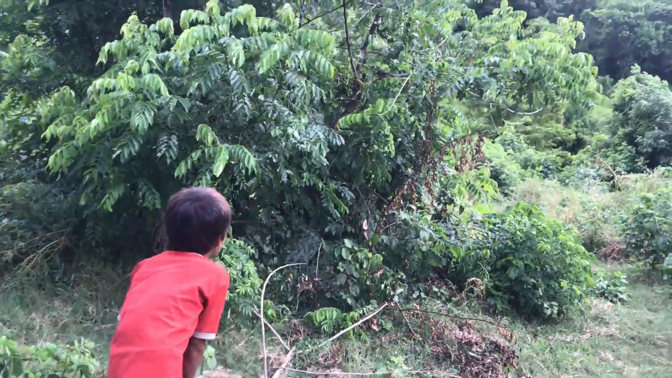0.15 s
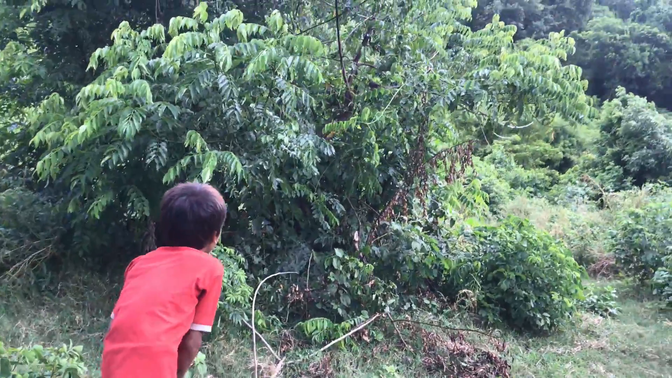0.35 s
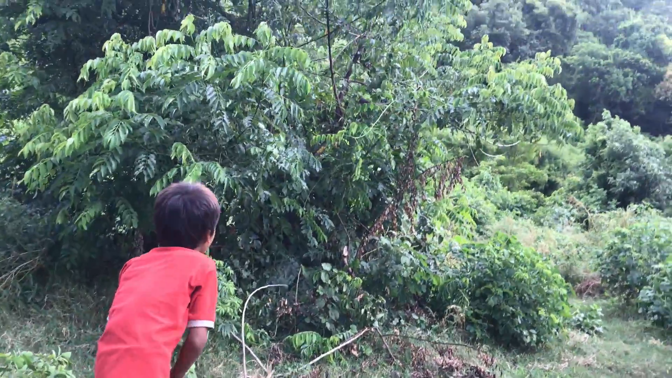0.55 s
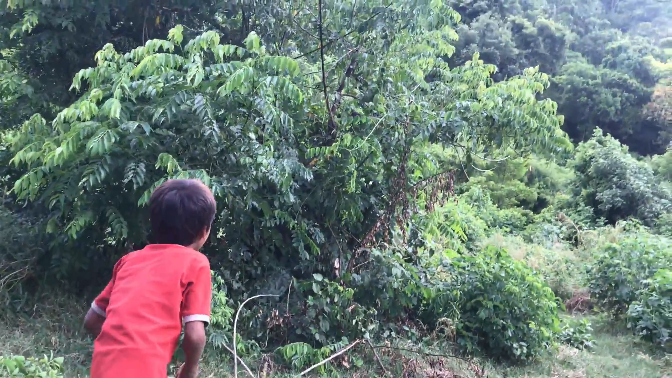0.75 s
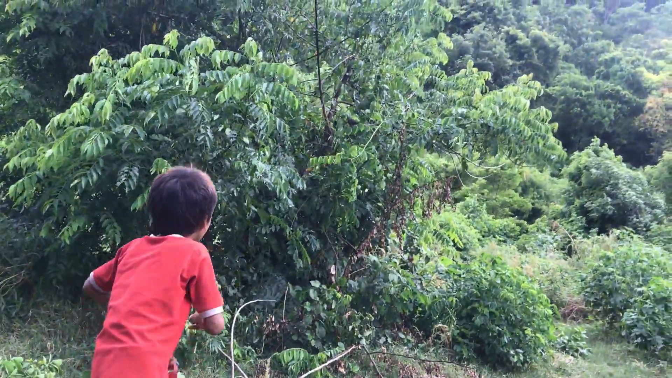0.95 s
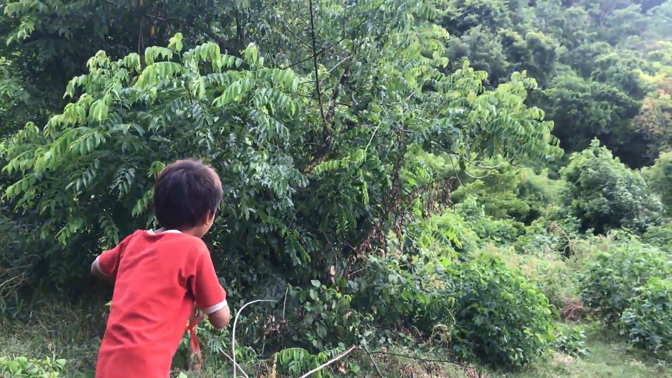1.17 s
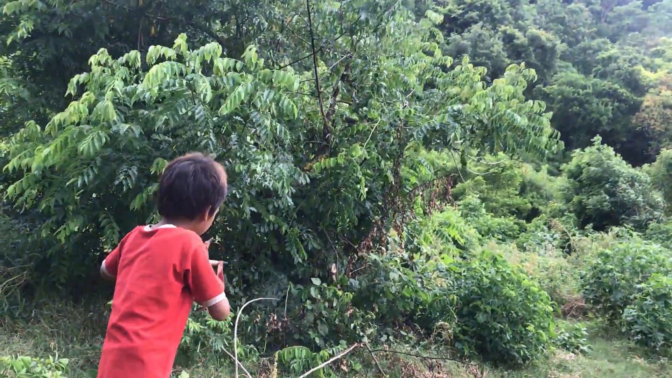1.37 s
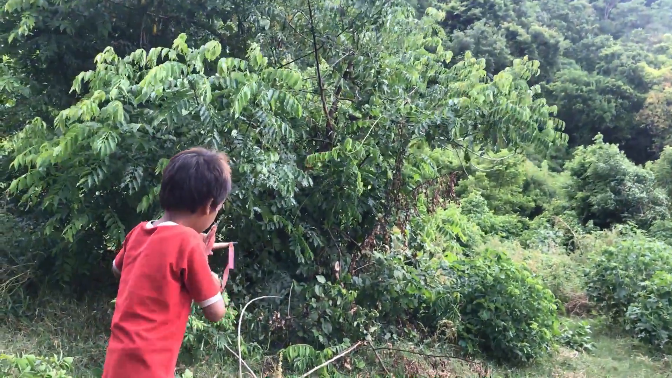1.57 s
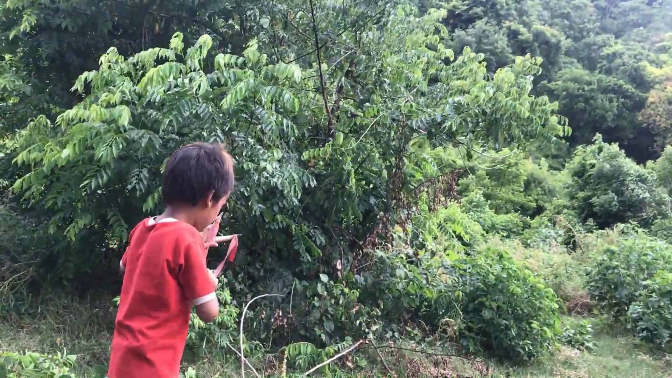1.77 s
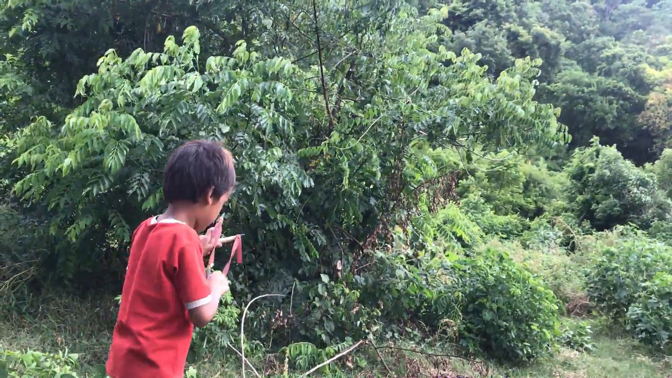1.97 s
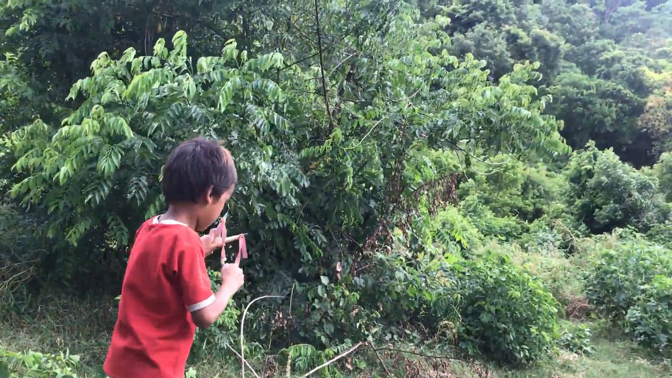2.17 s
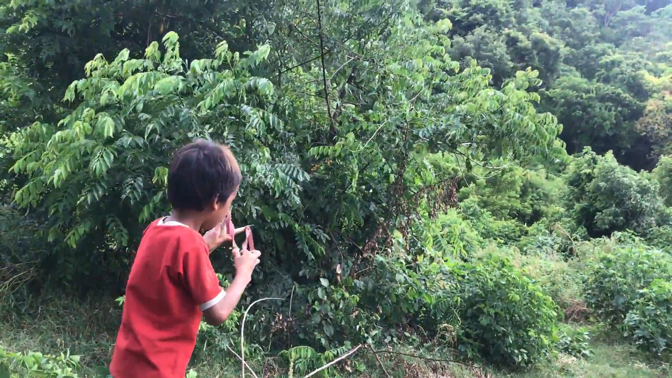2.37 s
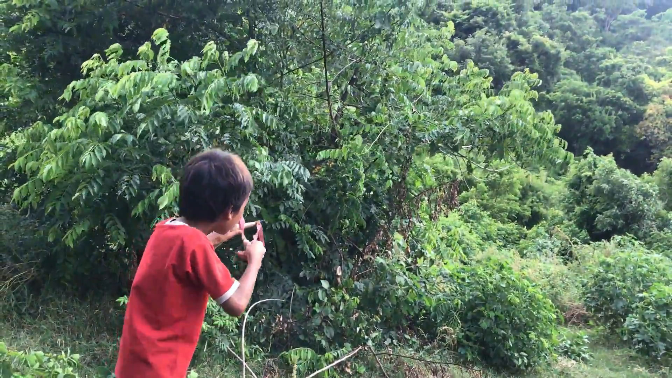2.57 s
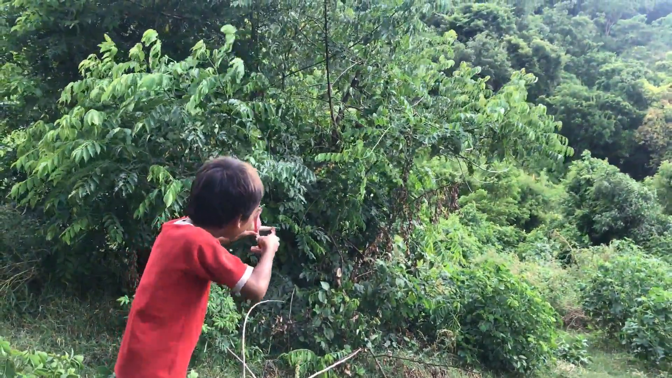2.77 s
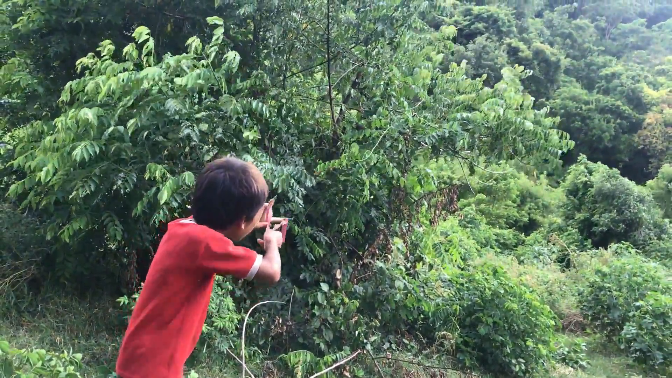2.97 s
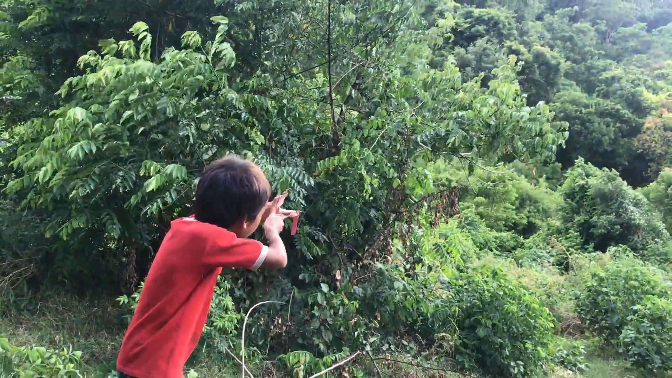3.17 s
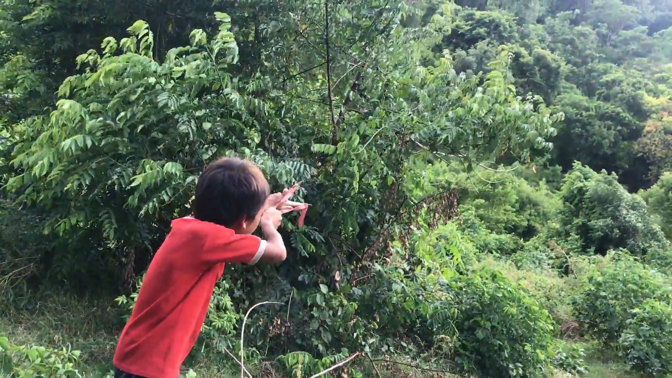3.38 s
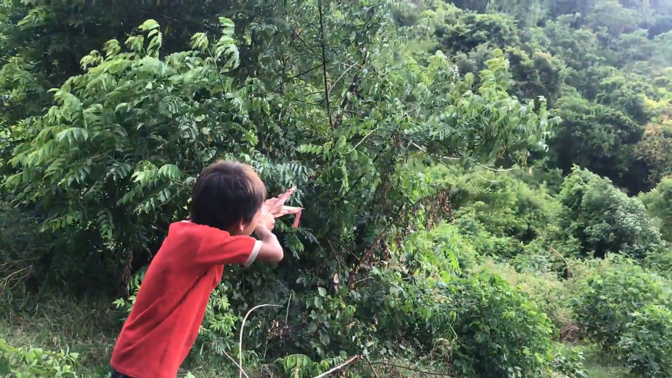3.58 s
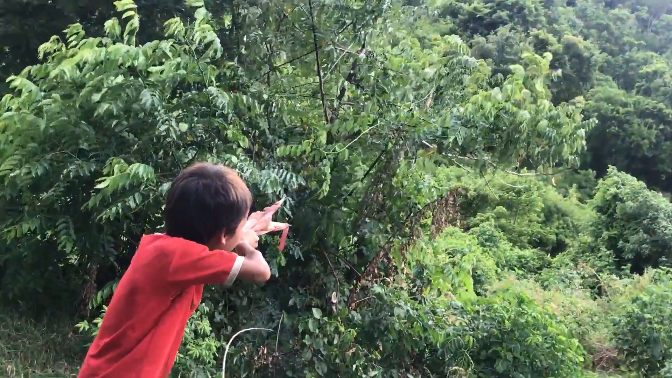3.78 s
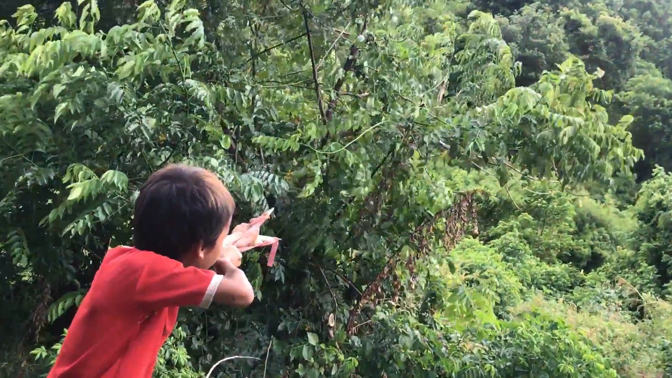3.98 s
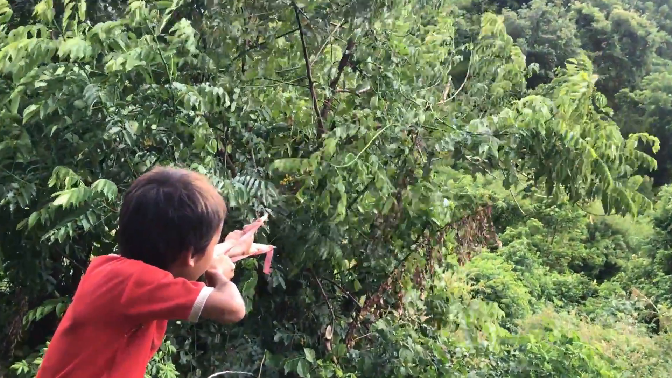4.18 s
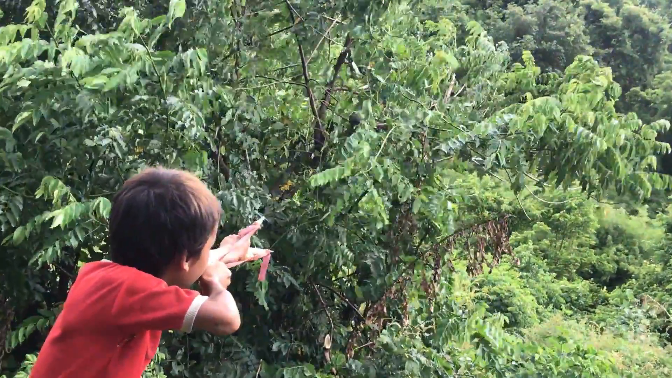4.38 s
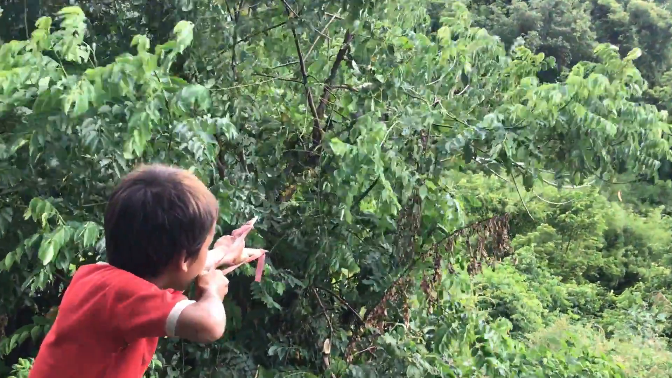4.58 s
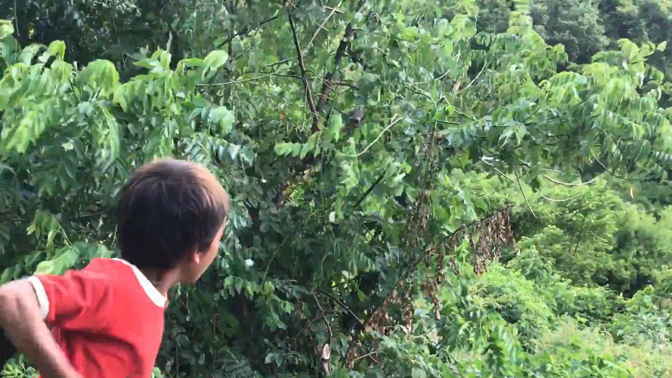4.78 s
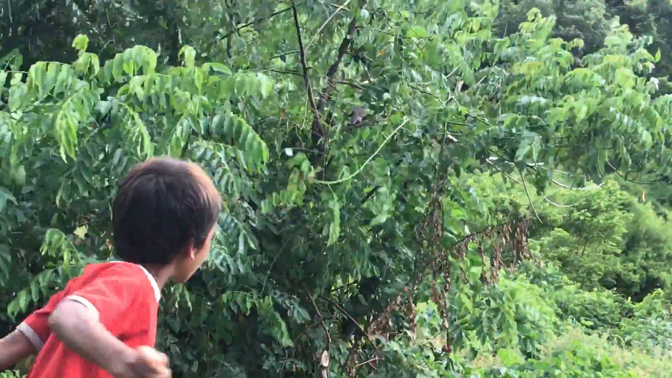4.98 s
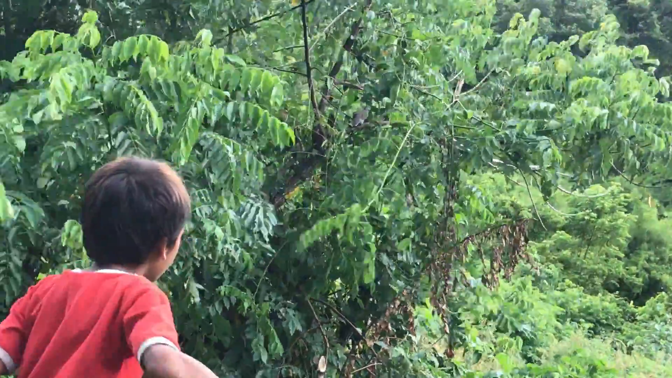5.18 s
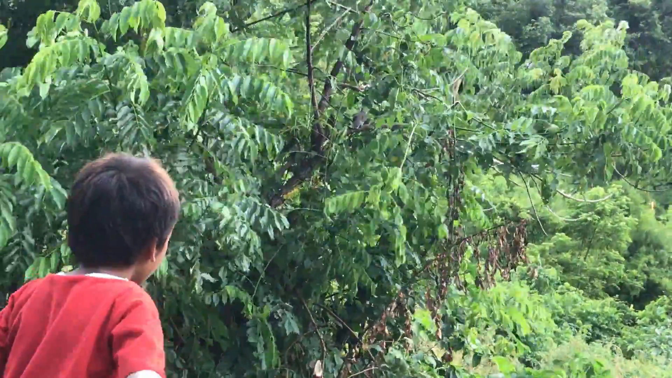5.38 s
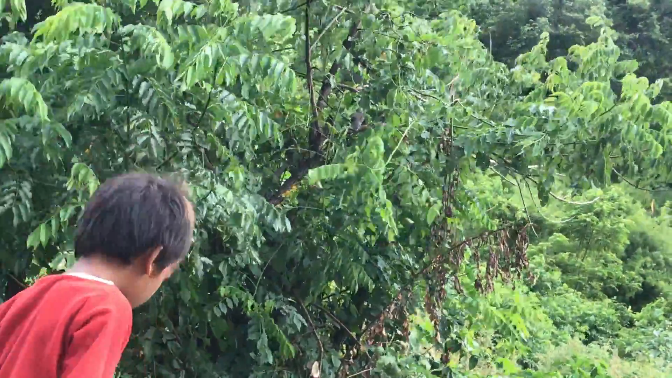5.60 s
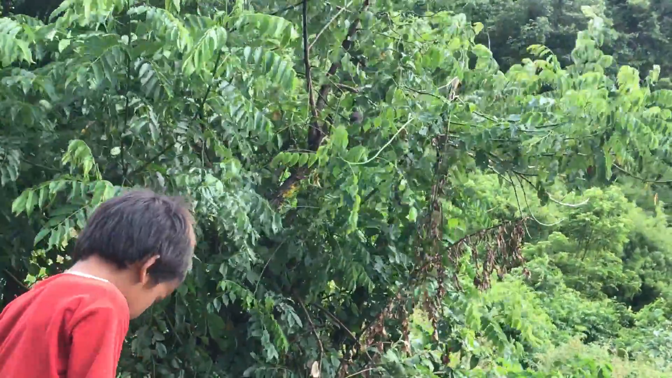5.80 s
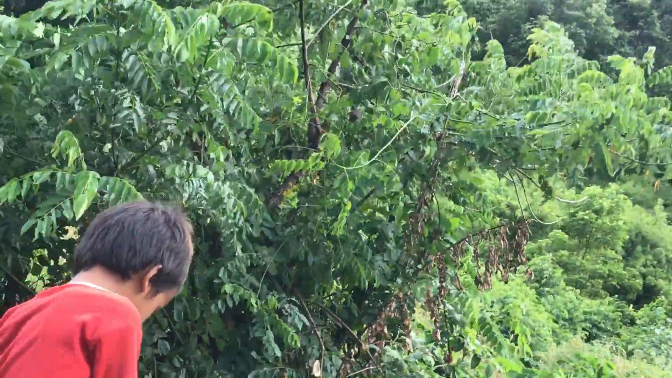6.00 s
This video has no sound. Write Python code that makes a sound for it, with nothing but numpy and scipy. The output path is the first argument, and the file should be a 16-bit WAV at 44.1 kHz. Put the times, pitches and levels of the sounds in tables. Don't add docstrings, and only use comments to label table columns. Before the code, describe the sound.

Steady shrill crickets and soft leaf hiss, small rustles, then a sudden band slap and hard crackling shot into foliage, with wind bumping the microphone.

```python
import sys
import numpy as np
from scipy import signal
from scipy.fft import rfft, irfft, next_fast_len
from scipy.io import wavfile
from scipy.ndimage import uniform_filter1d, map_coordinates

SR = 44100
rng = np.random.default_rng(int(sys.argv[2]) if len(sys.argv) > 2 else 0)


def digitize_waveform(pressure):
    field = np.atleast_2d(pressure).T
    bounded = np.clip(field, -1, 1)
    quanta = np.round(bounded * 32767).astype(np.int16)
    wavfile.write(sys.argv[1], SR, quanta)


def level_to_linear(level):
    exponent = np.asarray(level, float) / 20
    return 10 ** exponent


N = 266628
TIME_S = np.arange(N) / SR


def unit(x):
    return x / np.sqrt(np.mean(x ** 2) + 1e-20)


def curves(rows):
    s, *columns = np.transpose(rows)
    return [np.interp(TIME_S, s, column) for column in columns]


def wobble(rate, size=N):
    knots = rng.standard_normal(int(size * rate / SR) + 4)
    return map_coordinates(knots, [np.arange(size) * rate / SR])


def coloured(size, gain):
    white = rfft(rng.standard_normal(size))
    return unit(irfft(white * gain(np.fft.rfftfreq(size, 1 / SR) + 1), size))


def rush(spectrum, patchy_db):
    knot_hz, knot_db = np.transpose(spectrum)
    noise = coloured(next_fast_len(N), lambda hz: level_to_linear(np.interp(np.log(hz), np.log(knot_hz), knot_db)))
    cells = signal.stft(noise, nperseg=512)[2]
    field = uniform_filter1d(rng.standard_normal(cells.shape), 8, 0)
    field = uniform_filter1d(field, 12, 1)
    return unit(signal.istft(cells * level_to_linear(patchy_db * unit(field)), nperseg=512)[1][:N])


def add(track, s, sound):
    start = round(s * SR)
    sound = sound[max(-start, 0):][:len(track) - max(start, 0)]
    track[max(start, 0):][:len(sound)] += sound


def foliage(x, wet_db, t60):
    t = np.arange(SR // 4) / SR
    tail = level_to_linear(-60 * t / t60) * rng.standard_normal(len(t))
    return x + level_to_linear(wet_db) * signal.fftconvolve(x, tail / np.linalg.norm(tail))[:N]


# start_s, level_db
BREEZE = [
    (0, -56),
    (.76, -57.5),
    (1.63, -56),
    (3.3, -56.5),
    (3.82, -55),
    (4.55, -53),
    (5.12, -52.5),
    (6.05, -53),
]
# frequency_hz, density_db (per Hz)
LEAF_BODY = [(120, -37), (200, -4), (513, -7.5), (627, -4.5), (1990, -9), (4810, -12), (5440, -13.5),
             (5970, -9), (6650, -12.5), (8000, -33), (10400, -49), (17600, -120)]
# frequency_hz, density_db (per Hz)
LEAF_FIZZ = [(4300, -14), (7300, -2), (8300, -2), (9600, -3), (10400, -6.5), (11500, -2.5), (13000, -4),
             (14200, -7.5), (16000, -9)]


def leaves():
    body_db, = curves(BREEZE)
    fizz_db = -62 + 1.8 * (body_db - body_db.mean())
    stir_db = .5 * wobble(8.3) + 0.23 * wobble(25)
    body = level_to_linear(body_db + 0.12 * stir_db) * rush(LEAF_BODY, patchy_db=0.83)
    return body + level_to_linear(fizz_db + stir_db) * rush(LEAF_FIZZ, patchy_db=0.6)


# frequency_hz, density_db (per Hz)
RUMBLE = [(12, -65), (20, -44), (34, -14.5), (54, 1.5), (134, -6.5), (220, -16), (260, -24), (297, -18.5),
          (450, -24.5), (580, -33), (990, -120)]


def port_rumble():
    return level_to_linear(-54 + 1.26 * wobble(12)) * rush(RUMBLE, patchy_db=1.6)


# start_s, level_db, centre_hz
PUFFS = [(3.387, -36, 69), (3.422, -28.5, 91), (3.536, -35.5, 75), (3.59, -44, 126), (3.652, -41.5, 64),
         (3.769, -38.5, 135), (4.074, -33.5, 80), (4.12, -44, 170), (4.139, -34, 100), (4.446, -36.5, 138),
         (4.626, -36.5, 110), (4.661, -25.5, 165), (4.685, -28.5, 92), (4.705, -36, 129),
         (4.765, -35.5, 100), (4.795, -35.5, 93.5), (4.884, -35.5, 130), (4.907, -32.5, 82),
         (5.56, -33.5, 72), (5.675, -39.5, 83), (5.742, -37, 56.5), (5.76, -28, 172), (5.826, -35, 115),
         (5.871, -36, 89), (5.915, -37, 229), (5.925, -28, 114), (5.96, -30.5, 80), (5.996, -37, 95),
         (6.015, -25.5, 195), (6.043, -19.5, 139)]
SMALL_FROM_S, SMALL_DB, SMALL_SPREAD_DB, SMALL_HZ = 3.3, -46.5, 7, 65.6
EDGE_RATIO = 3.94


def eddies():
    out = np.zeros(N)
    t = np.arange(-2048, 2048) / SR
    bell = np.exp(-(t / 0.016) ** 2) + 0.73 * np.exp(-(t / 0.0079) ** 2)
    spread = [N / SR - SMALL_FROM_S, SMALL_SPREAD_DB, SMALL_HZ]
    small = [SMALL_FROM_S, SMALL_DB, SMALL_HZ] + rng.random((26, 3)) * spread
    for s, db, hz in [*PUFFS, *small]:
        def band(f):
            low_side = (f / hz) ** 1.51 / (1 + (f / hz) ** 4.12)
            return low_side / (1 + (f / hz / EDGE_RATIO) ** 4)

        eddy = bell * coloured(len(t), band)
        add(out, s + t[0], level_to_linear(db - 7.5) * eddy * np.linalg.norm(bell) / np.linalg.norm(eddy))
    return out


def whistle(hz, db, flutter_db, drift_hz):
    size = len(hz)
    level = level_to_linear(db + flutter_db * (0.69 * wobble(13.8, size) + wobble(56.1, size)))
    turns = np.cumsum(hz + drift_hz * wobble(39.7, size)) / SR
    return np.sqrt(2) * level * np.sin(2 * np.pi * turns)


def glide(length_s, hz, db):
    t = np.arange(0, length_s, 1 / SR)
    fade = np.clip(np.minimum(t, t[-1] - t) / .025, 0, 1)
    return fade * whistle(hz - 350 * t, db - .8, flutter_db=2.5, drift_hz=6.1)


# start_s, level_db
CROWD = [
    (0, -67),
    (.5, -65),
    (.84, -55),
    (2.6, -57.5),
    (3.7, -53),
    (4.8, -58.5),
    (5.35, -61.5),
    (6.05, -56),
]
# start_s, level_db
LOW_GROUP = [
    (0, -80),
    (.72, -65.5),
    (.95, -60),
    (1.15, -69.5),
    (2.9, -65.5),
    (3.3, -92),
    (6.05, -61),
]


def far_tree_crickets():
    strands = np.zeros(N)
    for s, pitch, size in rng.random((55, 3)):
        add(strands, s * N / SR - .1, glide(.15 + .25 * size, 5300 + 450 * pitch, db=-9))
    blur = rush([(5150, -40), (5320, 1), (5500, 1.5), (5750, -7), (6000, -26.5)], patchy_db=-1.2)
    low = rush([(4900, -42), (5080, 3), (5230, 4.0), (5350, 3), (5500, -37)], patchy_db=1.3)
    return level_to_linear(curves(CROWD)[0] - 8.0) * (blur + strands) + level_to_linear(curves(LOW_GROUP)[0]) * low


# start_s, pitch_hz, level_db
STEADY = [
    (0, 5690, -66),
    (.6, 5665, -71),
    (1.15, 5625, -64),
    (1.7, 5615, -70),
    (2.3, 5605, -72),
    (2.6, 5600, -85),
]


def steady_tree_cricket():
    pitch_hz, level_db = curves(STEADY)
    pulse_db = 3.5 * np.cos(2 * np.pi * (TIME_S - .075) / .145)
    return whistle(pitch_hz, level_db - 0.5 + pulse_db, flutter_db=4.5, drift_hz=7.7)


# start_s, length_s, pitch_hz (at first), level_db
WHISTLES = [(-0.02, .13, 5320, -60), (.32, .13, 5370, -67), (.6, .16, 5430, -67), (.77, .19, 5530, -65),
            (.9, .15, 5295, -64), (.86, .24, 5920, -74), (1.67, .2, 5530, -69), (2.05, .22, 5490, -69),
            (2.6, .32, 5670, -71), (2.68, .25, 5440, -67), (3.18, .42, 5930, -70), (3.25, .25, 5580, -67),
            (3.73, .2, 5790, -66), (3.95, .22, 5680, -63), (4.2, .12, 5590, -64), (4.3, .2, 5745, -64),
            (4.5, .22, 5680, -67), (5.0, .12, 5665, -63), (5.0, .3, 5560, -64), (5.28, .24, 5725, -65),
            (5.65, .3, 5730, -60), (5.82, .13, 6005, -64), (5.92, .08, 5740, -62)]


def single_tree_crickets():
    out = np.zeros(N)
    for start_s, length_s, hz, db in WHISTLES:
        add(out, start_s, glide(length_s, hz, db))
    return out


# start_s, first_hz, last_hz, crest_s, crest_db
NEAR = [(3.08, 5510, 5480, 3.21, -53), (3.31, 5465, 5315, 3.49, -52), (3.79, 5455, 5450, 3.87, -58),
        (3.98, 5445, 5365, 4.2, -56), (4.31, 5470, 5490, 4.35, -55), (4.46, 5530, 5395, 4.55, -56),
        (4.72, 5555, 5490, 4.77, -54), (4.96, 5465, 5415, 5.14, -59), (5.34, 5460, 5440, 5.45, -59),
        (5.5, 5430, 5405, 5.58, -53), (5.65, 5485, 5430, 5.7, -55)]
RISE_DB_PER_S, FALL_DB_PER_S, SLIDE_S = 85, 65, .04


def near_tree_cricket():
    start, first_hz, last_hz, crest, db = np.transpose(NEAR)
    end = np.append(start[1:] - SLIDE_S, N / SR)
    note = np.clip(np.searchsorted(start, TIME_S) - 1, 0, None)
    late = TIME_S - crest[note]
    drop_db = np.maximum(-RISE_DB_PER_S * late, FALL_DB_PER_S * late)
    level_db = uniform_filter1d(db[note] - drop_db, size=2000)
    knot_s, knot_hz = np.ravel([start, end], "F"), np.ravel([first_hz, last_hz], "F")
    pitch_hz = uniform_filter1d(np.interp(TIME_S, knot_s, knot_hz), size=1500)
    return whistle(pitch_hz, level_db, flutter_db=1.4, drift_hz=10.5)


CHIRP_LEAD_S = 1500 / SR


def chirp(hz, db, spread_s, fall_hz):
    t = np.arange(-1500, 1500) / SR
    hoarse = 1 + .2 * coloured(len(t), lambda f: f < 120)
    pitch_hz = hz - fall_hz * t * (1 - 9 * t)
    bell = np.exp(-np.abs((t - .003) / spread_s) ** 3)
    return level_to_linear(db) * hoarse * bell * np.sin(2 * np.pi * (np.cumsum(pitch_hz) / SR + rng.random()))


def far_bush_crickets():
    far = np.zeros(N)
    for s, pitch, size in rng.random((400, 3)) * [N / SR, 1, 1]:
        add(far, s - CHIRP_LEAD_S, chirp(6250 + 650 * pitch, 6 * size, spread_s=0.022, fall_hz=24540))
    haze = rush([(5800, -49), (6150, -13), (6500, -5.5), (6900, -2.5), (7300, -34)], patchy_db=2.5)
    crowd_db = -62.5 + 4 * np.cos(2 * np.pi * (TIME_S - 0.27) / 0.927)
    return level_to_linear(crowd_db - 6) * (0.94 * unit(far) + haze)


# first_s, last_s, centre_hz, last_level_db, swell_db (a stroke)
PHRASES = [(0.051, 0.375, 6480, -53, 1.2), (0.23, 0.334, 6420, -53, 1.5), (.82, 0.921, 6430, -61, -1),
           (1.095, 1.27, 6480, -61, -1), (1.568, 1.676, 6630, -52.5, 0.5), (2.0, 2.108, 6460, -58, 4),
           (2.273, 2.277, 6540, -51, 0.1), (2.927, 3.04, 6480, -54, 0), (3.052, 3.17, 6520, -50.5, 1.5),
           (3.257, 3.383, 6550, -59, -1.5), (3.8, 3.958, 6460, -58, -0.5), (3.914, 4.03, 6600, -54.5, -1),
           (4.275, 4.397, 6630, -53.5, -0.8), (4.7, 4.752, 6470, -60, 1.5), (5.011, 5.07, 6600, -55.5, -6),
           (5.052, 5.097, 6550, -58, -7), (5.256, 5.434, 6660, -55.5, -1), (5.546, 5.6, 6470, -58, .1),
           (5.696, 5.863, 6520, -54.5, -1.2), (6.009, 6.01, 6500, -65, .1)]
STROKE_GAP_S, STROKE_SCATTER_DB, STROKE_SCATTER_HZ = .057, 1.2, 50


def near_bush_crickets():
    near = np.zeros(N)
    for first, last, hz, last_db, swell_db in PHRASES:
        count = round((last - first) / STROKE_GAP_S) + 1
        for k, s in enumerate(np.linspace(first, last, count)):
            pitch, size = rng.standard_normal(2) * [STROKE_SCATTER_HZ, STROKE_SCATTER_DB]
            db = last_db - .3 + size - swell_db * (count - 1 - k)
            add(near, s - CHIRP_LEAD_S, chirp(hz + pitch, db, spread_s=.016, fall_hz=24000))
    return foliage(near, wet_db=-9, t60=.12)


# start_s, level_db
JINGLES = [
    (.018, -60),
    (.442, -51),
    (.483, -57),
]
# frequency_hz, level_db, t60_s
METAL = [(8200, -8, .05), (11000, -8, .03), (12130, -2.5, 0.095), (13500, -5, .04), (14400, -2, .05),
         (15100, -6, .02)]


def metal_ring():
    out, t = np.zeros(N), np.arange(SR // 4) / SR
    for s, db in JINGLES:
        for hz, mode_db, t60 in METAL:
            rattle = coloured(len(t), lambda f: 1 / (1 + ((f - hz) / 90) ** 2))
            add(out, s, level_to_linear(db + mode_db + rng.normal(0, 2) - 60 * t / t60) * rattle)
    return out


def scrape(db, hz, width_hz, t60):
    t = np.arange(SR // 4) / SR
    rasp = coloured(len(t), lambda f: 1 / (1 + ((f - hz) / width_hz * 2) ** 2) * f / (f + 400))
    grain = level_to_linear(2.2 * coloured(len(t), lambda f: f < 900))
    shape = level_to_linear(db - 8 - 60 * t / t60) * (1 - np.exp(-t / 0.0002))
    sound = shape * rasp * grain
    return sound * np.linalg.norm(shape) / np.linalg.norm(sound)


# start_s, peak_db, centre_hz, t60_s
RUSTLES = [(.13, -58, 12000, .1), (.203, -53, 12000, 0.3), (.442, -39, 4400, .022),
           (.442, -44, 14000, .078), (.483, -46, 4000, .02), (.483, -49, 14000, .09),
           (.445, -51, 8600, 0.052), (.672, -39.5, 1000, .027), (1.921, -38, 920, 0.043),
           (2.252, -39, 1200, .025), (2.251, -38, 2800, .015), (3.915, -41, 9000, .015),
           (3.943, -29.5, 4850, .014), (4.156, -47, 11000, .03), (4.698, -43, 11050, .025),
           (5.046, -34.5, 2420, .042), (5.298, -36, 2920, 0.064), (5.51, -45, 11000, .03),
           (5.664, -41, 9080, .02)]


def rustles():
    out = np.zeros(N)
    for s, db, hz, t60 in RUSTLES:
        add(out, s, scrape(db, hz, 700 + .55 * hz, t60))
    return out


# start_s, peak_db, centre_hz, width_hz, t60_s
RELEASE = [(4.8034, -27.5, 2900, 600, 0.031), (4.803, -30, 11000, 8000, .012),
           (4.823, -32, 5000, 16000, 0.17), (4.826, -34.5, 450, 1400, 0.17),
           (4.846, -40, 4000, 7000, 0.045), (4.8658, -30, 5000, 12000, .03),
           (4.9069, -21, 6960, 16000, 0.07), (4.908, -19, 1600, 3000, 0.017),
           (4.9361, -22.5, 11900, 8900, 0.067), (4.9369, -16, 4300, 8000, 0.046),
           (4.938, -23.5, 600, 1800, 0.041), (4.94, -25.5, 3760, 6000, 0.16),
           (4.975, -35.5, 1500, 2500, 0.14)]


def slingshot_release():
    out = np.zeros(N)
    for s, db, hz, width_hz, t60 in RELEASE:
        add(out, s, scrape(db, hz, width_hz, t60))
    return out


# start_s, peak_db, centre_hz, width_cycles
CRACKS = [(4.8243, -29, 9000, 2), (4.8263, -28, 8500, 2), (4.83, -31, 7000, .9), (4.8333, -27, 14000, 2.5),
          (4.8355, -34, 13500, 2), (4.838, -30, 1900, 1.1), (4.84, -33, 4500, 1.3), (4.8679, -24, 3600, .7),
          (2.2525, -43, 1600, .7), (3.943, -36, 4500, .9), (5.3, -39, 2800, 1.3), (4.9124, -24, 4200, .8),
          (4.9095, -12, 4600, .8), (4.91122, -19, 4600, .8), (4.9369, -13, 2300, .6),
          (4.9375, -20, 5000, .7), (4.9386, -18, 5500, .8), (4.9396, -20, 4500, .8)]
DEBRIS_S, DEBRIS_LENGTH_S, DEBRIS_DB, DEBRIS_FADE_DB = 4.95, .07, -37, 7


def cracks():
    out, t = np.zeros(N), np.arange(200) / SR
    late, size, pitch = rng.random((40, 3)).T
    debris_s = DEBRIS_S + DEBRIS_LENGTH_S * late
    debris_db = DEBRIS_DB - DEBRIS_FADE_DB * late - 6 * size
    debris = np.transpose([debris_s, debris_db, 900 * 6 ** pitch, np.ones(40)])
    for s, db, hz, cycles in [*CRACKS, *debris]:
        turn = (t - t[100]) * hz
        add(out, s - t[100], level_to_linear(db) * np.exp(-(turn / cycles) ** 2) * np.cos(2 * np.pi * turn))
    return out


def within_band(x, top_hz):
    size = next_fast_len(N + SR // 4)
    hz = np.fft.rfftfreq(size, 1 / SR)
    response = (hz < top_hz) * hz ** 2 / np.hypot(hz ** 2, 27 ** 2)
    return irfft(rfft(x, size) * response, size)[:N]


def scene():
    wind = leaves() + port_rumble() + eddies()
    tree_crickets = far_tree_crickets() + steady_tree_cricket() + single_tree_crickets()
    bush_crickets = far_bush_crickets() + near_bush_crickets()
    steady = wind + tree_crickets + near_tree_cricket() + bush_crickets
    slingshot = metal_ring() + rustles() + slingshot_release() + cracks()
    port = within_band(steady, 15800) + within_band(slingshot, 16300)
    return np.array([port, port])


def band_limit(x):
    return signal.sosfilt(signal.butter(12, 16520, fs=SR, output="sos"), x)


def record(dry):
    return band_limit(dry)


dry = scene()
out = record(dry)
digitize_waveform(out)
```